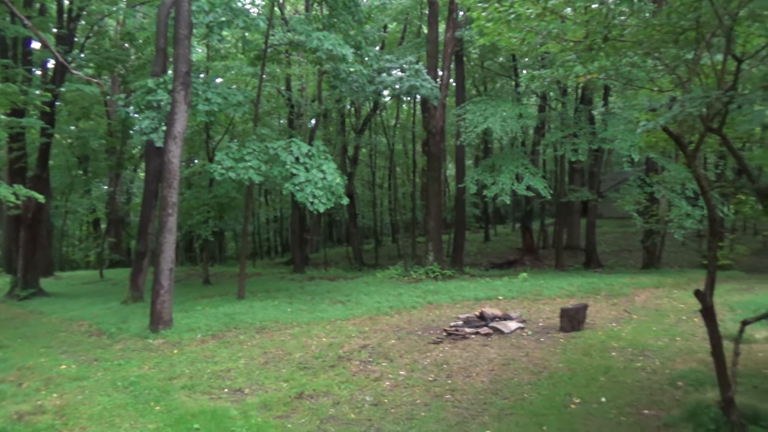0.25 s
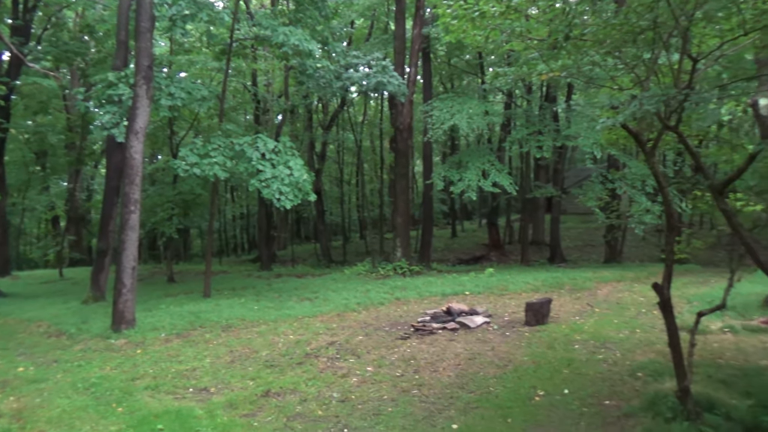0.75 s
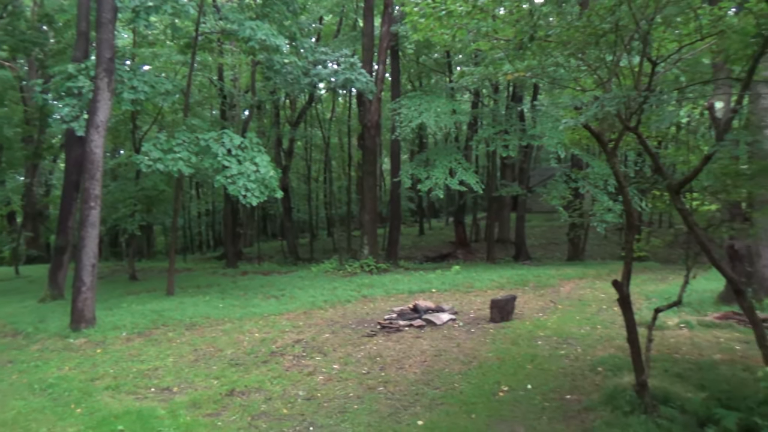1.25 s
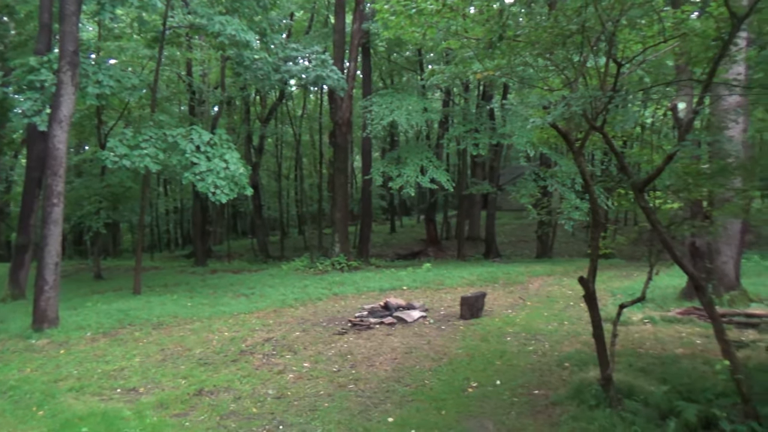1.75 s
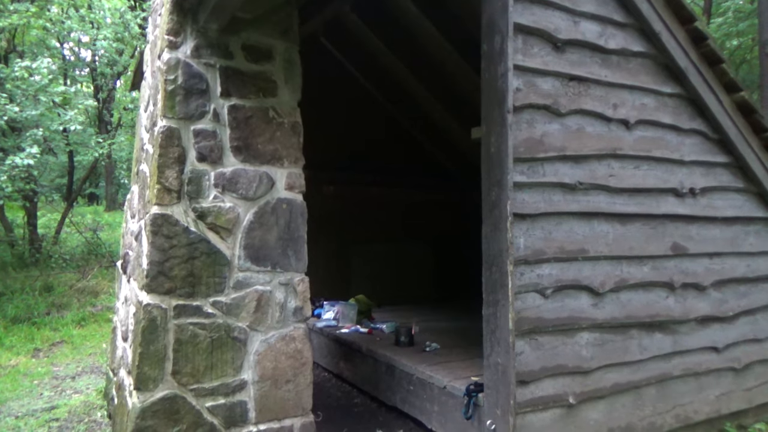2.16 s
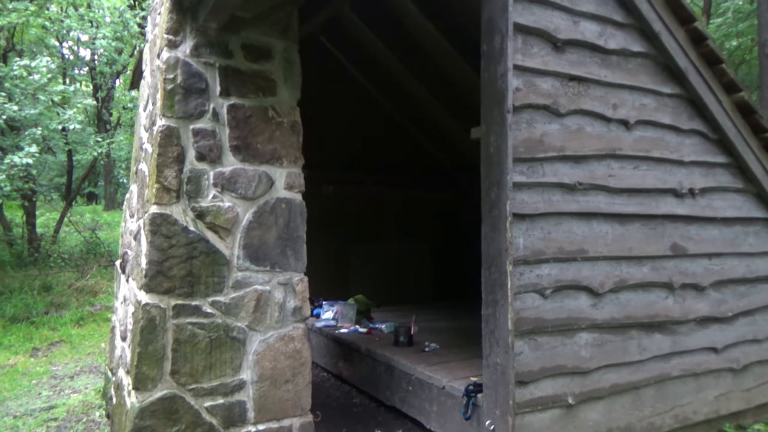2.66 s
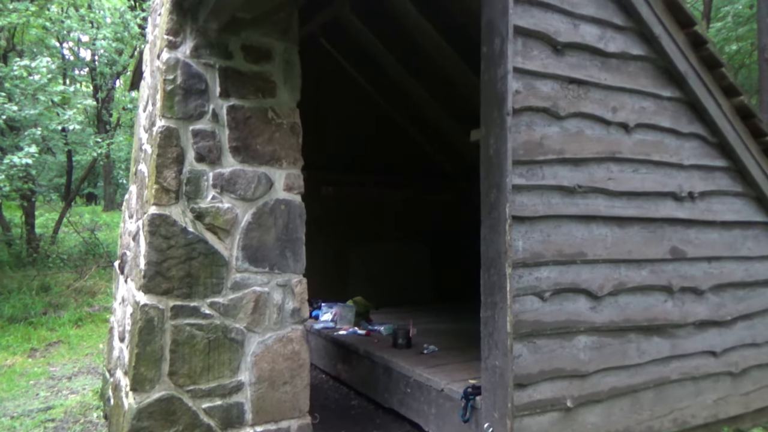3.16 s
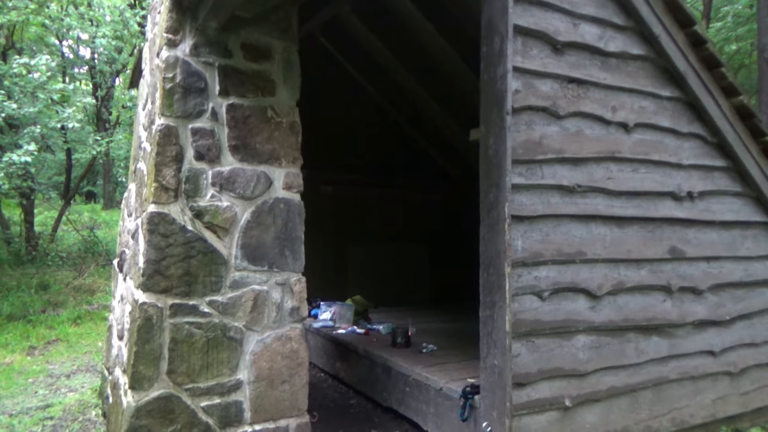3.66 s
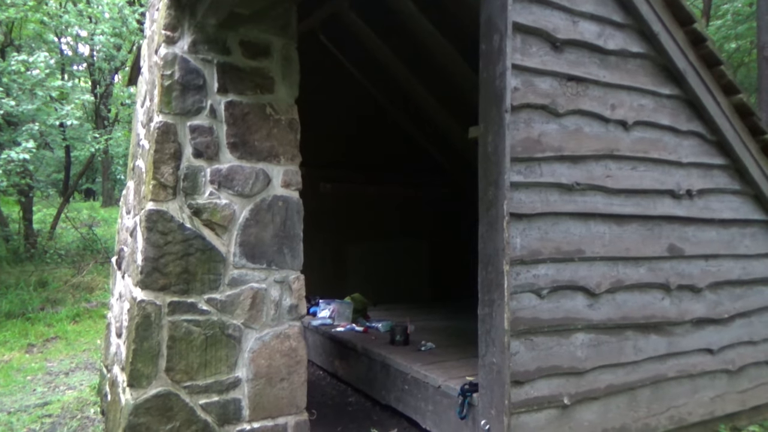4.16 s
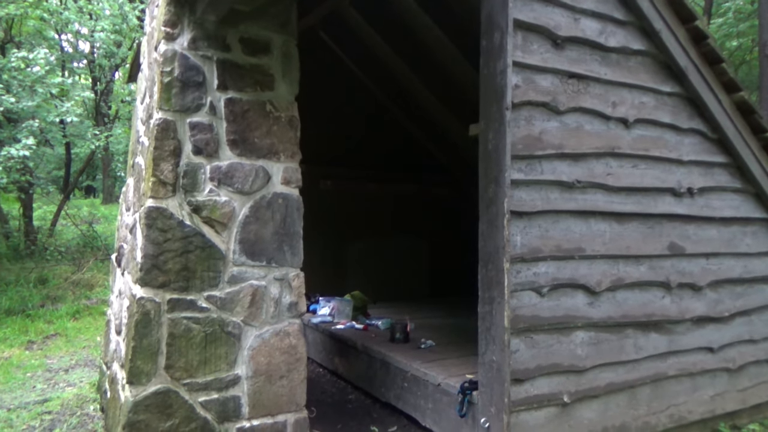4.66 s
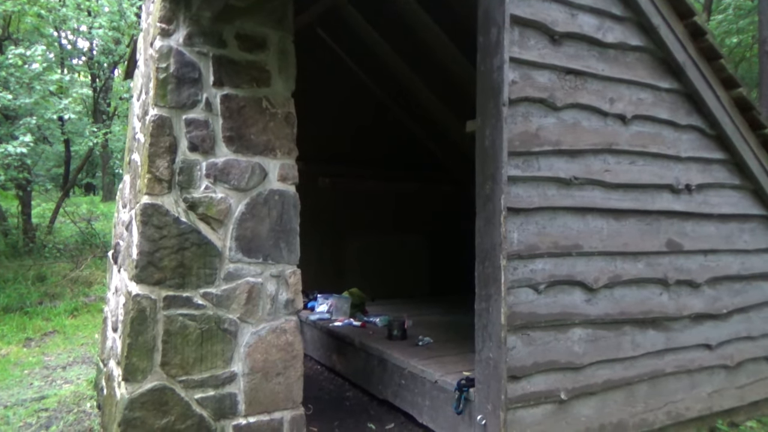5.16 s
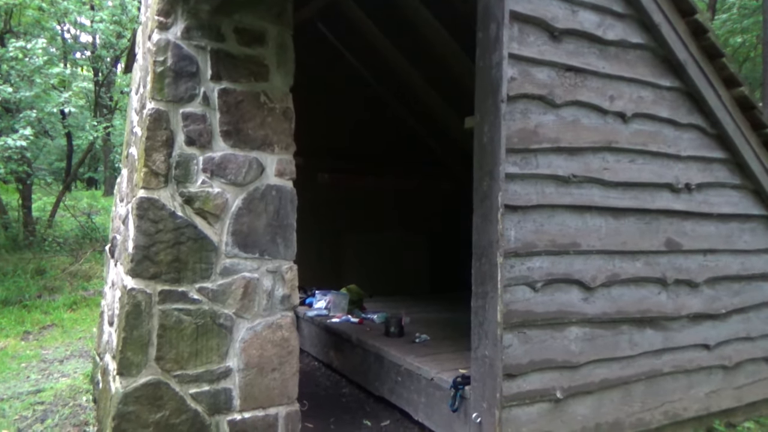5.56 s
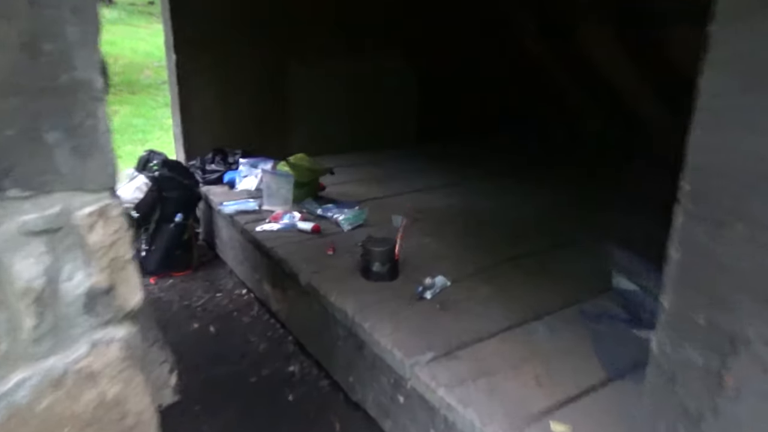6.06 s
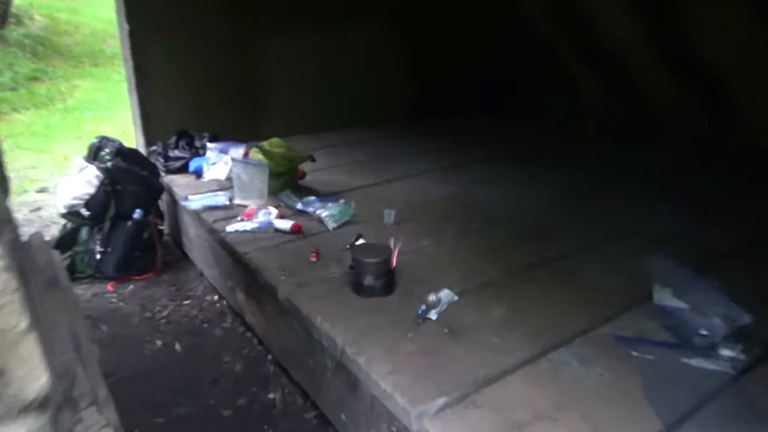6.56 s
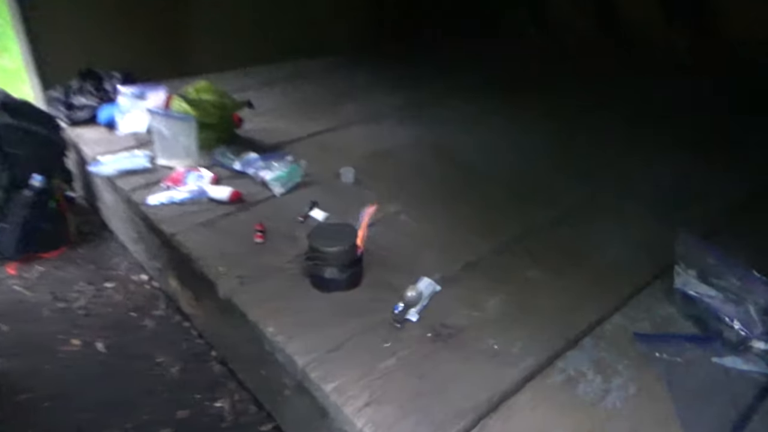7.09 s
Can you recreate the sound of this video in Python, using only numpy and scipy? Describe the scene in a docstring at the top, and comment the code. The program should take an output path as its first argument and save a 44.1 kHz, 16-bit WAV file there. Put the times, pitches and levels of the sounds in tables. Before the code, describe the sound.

In quiet woods, distant songbirds whistle short echoing phrases over a soft hush and a faint, far-off engine drone. Small things tick on the leaves. Midway, a nearer bird sings a long, dry, high trill. Near the end, two footsteps close to the microphone crunch on grit and dry leaves, snapping twigs, while the faint hollow murmur of a wooden shelter comes up.

```python
"""A quiet morning wood beside a camp shelter. From the start an engine drones far off under the hush,
distant songbirds whistle short phrases and small things tick on the leaves; the trees scatter each note.
Three seconds in, a nearer bird sings a long dry trill. Near six seconds two steps crunch on grit and
dry leaves, snapping twigs, as the shelter screens the engine and its own hollow murmur comes up."""
import sys
import numpy as np
from scipy import signal
from scipy.fft import rfft, irfft
from scipy.io import wavfile
from scipy.ndimage import uniform_filter1d

SR = 44100
rng = np.random.default_rng(int(sys.argv[2]) if len(sys.argv) > 2 else 0)


def put_to_file(sound):
    """Save the sound as 16-bit audio at rate SR, in the file named by the first command-line argument."""
    columns = np.atleast_2d(sound).T  # one column per channel
    safe = np.clip(columns, -1, 1)
    whole_steps = np.round(safe * 32767)
    wavfile.write(sys.argv[1], SR, whole_steps.astype(np.int16))


N = 323208
TIME = np.arange(N) / SR

# Tone of the crunch: (frequency [Hz], level [dB])
GRIT_SPECTRUM = [(100, -33), (260, -19.5), (380, -16), (600, -12.5), (950, -4.5), (1400, -3), (2100, -3),
                 (2750, -5.5), (3400, -7), (4500, -11.5), (6300, -11.5), (7700, -7.5), (10000, -6.5),
                 (11500, -14), (16000, -32)]
# Footfalls: (touchdown [s], heel level [dB], heel treble [dB], sole level [dB],
# time to toe-off [s], toe treble [dB], ground thud [dB])
FOOTSTEPS = [(5.95, -19, -4.5, -41, .168, 0, -28), (6.551, -32.5, 4, -42, .262, 3, -36)]

def footsteps(grains_per_s=7000, spread_db=3.0, clump_db=1.8, clumps_per_s=140, crossover_hz=4200):
    """Under each scuff a shower of grit grains slips and cracks, in clumps."""
    # a soft stir and a high rustle linger after the first step
    first_s = FOOTSTEPS[0][0]
    body_power = swell(first_s, db=-49, rise_s=.0079, decay_s=.98) ** 2
    fizz_power = swell(first_s, db=-50, rise_s=.0079, decay_s=3.5) ** 2
    slip = unit(amp(clump_db * wander(N, clumps_per_s)))
    for *step, _ in FOOTSTEPS:
        for force, treble_db in scuffs(*step):
            body_power += (slip * force) ** 2
            fizz_power += (slip * force * amp(treble_db)) ** 2
    # a harder push moves more grains, so the crunch is dense and its tail crackles
    grain_chance = grains_per_s / SR * np.clip(np.sqrt(body_power) / amp(-36), .2, 4)
    crunch = np.zeros(N)
    for kind, power in (("low", body_power), ("high", fizz_power)):
        size_db = spread_db * np.minimum(rng.exponential(1, N), 3.5)
        sizes = unit(amp(size_db) * rng.choice([-1, 1], N))
        grains = sizes * (rng.random(N) < grain_chance) / np.sqrt(grain_chance)
        crossover = signal.butter(4, crossover_hz, kind, fs=SR, output="sos")
        crunch += signal.sosfilt(crossover, colour(grains, GRIT_SPECTRUM)) * np.sqrt(power)
    return crunch


def scuffs(s, heel_db, heel_treble_db, sole_db, roll_s, toe_treble_db, settle_s=.046):
    """The shoe touches, the heel lands, grit settles, the sole rolls, the toe pushes off."""
    touch = swell(s, heel_db - 10.5, rise_s=.003, decay_s=.0081)
    heel = swell(s + .018, heel_db, rise_s=.0079, decay_s=.0145)
    settle = swell(s + settle_s, heel_db - 14, rise_s=.0082, decay_s=.046)
    sole = swell(s + settle_s, sole_db, rise_s=.018, decay_s=.054, hold_s=roll_s - settle_s)
    toe = swell(s + roll_s, db=-37, rise_s=.0052, decay_s=.014)
    # (force envelope, treble [dB])
    return [(touch, 3.5), (heel, heel_treble_db), (settle, 0), (sole, -1.5), (toe, toe_treble_db)]


# Tone of a brittle crack: (frequency [Hz], level [dB])
CRACK_SPECTRUM = [(100, -10), (500, -5), (3000, -7), (6000, -8), (10000, 0.5), (11800, -10.5), (16000, -33)]
# Twig and pebble hits: (time [s], ring peak [dB], ring pitch [Hz], crack peak [dB])
TWIG_SNAPS = [(.311, -58, 2000, -40), (0.788, -37.5, 1990, -31), (1.691, -42, 2770, -32),
              (1.719, -40, 880, -26.5), (2.113, -53, 1950, -38.5), (3.885, -37.5, 1320, -53),
              (3.891, -35.5, 1240, -53), (4.056, -47, 850, -37), (4.3, -46, 1930, -38),
              (5.93, -22.5, 2000, -30.5), (5.953, -21, 1340, -13), (5.984, -14, 2060, -27),
              (6.105, -28, 1660, -24), (6.174, -31, 1570, -27), (6.24, -20.5, 1620, -38),
              (6.345, -43, 3540, -35), (6.686, -24, 2270, -45), (6.704, -29, 1820, -31),
              (6.727, -25.5, 1920, -28), (6.747, -22, 1850, -30), (6.782, -29, 1810, -44),
              (6.813, -41, 2500, -32), (6.98, -44, 1034, -30.5)]

def twig_snaps(ring_s=0.00049, crack_s=0.00052, crumble_s=0.012, crumble_db=-17):
    """Twigs snap and pebbles knock: a brief ring, a bright crack and a crumbling tail."""
    out, t = np.zeros(N), np.arange(2000) / SR
    crumble = amp(crumble_db) * np.exp(-t / crumble_s)
    for s, ring_db, ring_hz, crack_db in TWIG_SNAPS:
        ring = np.sin(2 * np.pi * ring_hz * t) * t / ring_s * np.exp(1 - t / ring_s)
        ring += crumble * unit(band(rng.standard_normal(len(t)), ring_hz / 2, ring_hz * 2.06))
        burst = rng.standard_normal(len(t)) * (np.exp(-t / crack_s) + crumble)
        crack = colour(burst, CRACK_SPECTRUM)
        add(out, s, amp(ring_db) * ring + amp(crack_db) * crack / abs(crack).max())
    return out


# Stray soft knocks: (time [s], level [dB], centre [Hz], decay [s])
SOFT_KNOCKS = [(0.596, -48, 526, 0.0041), (3.503, -49.5, 2100, 0.011), (3.891, -42, 474, 0.0077),
               (3.901, -45, 1100, 0.0056), (5.209, -49.5, 1700, 0.0091), (6.234, -35, 1530, 0.0082),
               (6.675, -35, 2150, 0.0074), (7.29, -42.5, 810, 0.017)]
# The ground under each heel: (delay [s], level against the step's thud [dB], centre [Hz], decay [s])
GROUND_LAYERS = [(-.003, -1.5, 700, .012), (.012, 0, 680, 0.0081), (.014, -7, 265, .01)]

def thuds(band_ratio=1.47, rise_s=0.000067):
    """Dull blows that hardly ring: stray knocks, and the ground under each step."""
    out, t = np.zeros(N), np.arange(8000) / SR
    blows = list(SOFT_KNOCKS)
    for s, *_, thud_db in FOOTSTEPS:
        blows += [(s + delay, thud_db + db, hz, decay) for delay, db, hz, decay in GROUND_LAYERS]
    blows += [(s + .03, -55, 49.6, .079) for s, *_ in FOOTSTEPS]  # deep bump as the weight comes down
    for s, db, hz, decay_s in blows:
        blow = unit(band(rng.standard_normal(len(t)), hz / band_ratio, hz * band_ratio))
        add(out, s, amp(db) * blow * np.exp(-t / decay_s) * (1 - np.exp(-t / rise_s)))
    return out


def bird_trill(start_s=3.16, length_s=1.81, syllables_per_s=12.4):
    """A nearer bird repeats a thin high note and a steep falling chip, swells and breaks off."""
    tops, chips = np.zeros((2, N))
    for age in np.arange(0, length_s, 1 / syllables_per_s):
        s, left_s = start_s + age, length_s - age
        effort = amp(-8.5 * np.exp(-age / .1)) * min(left_s / .1, 1)  # soft start, quick release
        top_db, chip_db = -47.5 - 4 * left_s, -46 - 3 * left_s  # slow crescendo
        hz = 7557 + 330 * np.exp(-age / .208)  # the top note sinks as the trill gets going
        top = whistle(length_s=.07, start_hz=1.075 * hz, middle_hz=1.008 * hz, end_hz=1.004 * hz,
                      buzz=.06)
        add(tops, s, effort * amp(top_db) * top)
        chip = whistle(length_s=.075, start_hz=6490, middle_hz=5570, end_hz=4293, buzz=.428)
        chip = unit(chip * np.hanning(len(chip)) ** .5)
        add(chips, s + .022, effort * amp(chip_db) * chip)
    return woods(tops, direct_db=-9) + woods(chips, direct_db=-11)


# Clear notes sliding onto a held pitch: (time [s], length [s], start [Hz], held [Hz], level [dB])
CLEAR_WHISTLES = [(0.189, 0.13, 2150, 1943, -67), (.853, .12, 3750, 4410, -60.5),
                  (.965, 0.127, 4400, 4440, -64.5), (1.235, 0.075, 2330, 2206, -58),
                  (1.551, 0.065, 3720, 3510, -58.5), (3.32, .1, 2270, 1946, -64.5),
                  (3.487, .09, 2800, 3210, -57.5), (4.87, 0.058, 1960, 1850, -61),
                  (4.919, 0.077, 2257, 2207, -56)]
# Burry notes sweeping evenly up or down: (time [s], length [s], start [Hz], end [Hz], level [dB])
BURRY_SLURS = [(0, 0.12, 3490, 2327, -66.5), (.79, .1, 3160, 3690, -60), (1.597, 0.05, 3500, 2440, -57),
               (1.742, 0.068, 2700, 3010, -69), (1.864, 0.08, 6900, 5500, -58),
               (1.971, 0.29, 7850, 6120, -58.5), (2.156, 0.19, 4980, 5840, -60),
               (2.894, 0.071, 3014, 2550, -58), (3.521, 0.0725, 3170, 2710, -59),
               (4.431, .11, 2750, 3500, -54), (4.528, .12, 3700, 4420, -55.5),
               (4.56, 0.056, 3200, 2107, -54.5), (4.883, .22, 2560, 3555, -58.5),
               (5.549, 0.27, 4990, 4780, -65), (5.754, .1, 3590, 2590, -58),
               (6.436, 0.086, 3890, 2980, -55.5)]

def far_birds():
    """Phrases from deep among the trees; clear notes carry more directly than burry ones."""
    clear, burry = np.zeros((2, N))
    for s, length_s, start_hz, held_hz, db in CLEAR_WHISTLES:
        middle_hz = start_hz + .9 * (held_hz - start_hz)
        add(clear, s, amp(db) * whistle(length_s, start_hz, middle_hz, held_hz, buzz=.0093))
    for s, length_s, start_hz, end_hz, db in BURRY_SLURS:
        middle_hz = np.sqrt(start_hz * end_hz)
        add(burry, s, amp(db) * whistle(length_s, start_hz, middle_hz, end_hz, buzz=.524))
    return woods(clear, direct_db=-3.5) + woods(burry, direct_db=-11)


def whistle(length_s, start_hz, middle_hz, end_hz, buzz, flutter_hz=95):
    """One gliding bird note; a fast flutter of pitch gives it buzz (0-1)."""
    progress = np.linspace(0, 1, max(int(length_s * SR), 16))
    glide_hz = np.polyval(np.polyfit([0, .5, 1], [start_hz, middle_hz, end_hz], 2), progress)
    flutter = np.sin(2 * np.pi * (flutter_hz * length_s * progress + rng.random()))
    flutter += .727 * wander(len(progress), 324)
    hz = glide_hz * (1 + (.0021 + .1084 * buzz) * flutter)
    return unit(sine(hz) * signal.windows.tukey(len(hz), .5))


def leaf_ticks(per_s=9, level_db=-52, spread_db=3, decay_s=0.0017):
    """Now and then something tiny drops on the leaves."""
    sizes = amp(level_db + spread_db * np.minimum(rng.exponential(1, N), 3))
    drops = sizes * (rng.random(N) < per_s / SR)
    t = np.arange(400) / SR
    tick = colour(rng.standard_normal(len(t)) * np.exp(-t / decay_s), CRACK_SPECTRUM)
    return signal.oaconvolve(drops, tick / abs(tick).max())[:N]


# The engine's low tone builds until the shelter screens it: (time [s], level [dB])
ENGINE_FADER = [(0.3, -75), (5.85, -56), (5.93, -66.5), (7.25, -59.5)]

def far_engine(low_hz=110, high_hz=209, high_db=-72, rumble_db=-67):
    """An engine a long way off: two wavering tones over a rumble."""
    low = sine(low_hz + 4 * wander(N, 14.6)) * (1 + .18 * wander(N, 24))
    high = sine(high_hz + 3 * wander(N, 8.68)) * (1 + .71 * wander(N, 1.77))
    rumble = unit(band(rng.standard_normal(N), 74, 101, order=3))
    low_db = np.interp(TIME, *np.transpose(ENGINE_FADER))
    return amp(low_db) * unit(low) + amp(high_db) * unit(high) + amp(rumble_db) * rumble


# Tone of the open air: (frequency [Hz], level [dB])
AIR_SPECTRUM = [(20, -18), (45, -4.5), (80, -4.5), (130, -5), (190, -5.5), (270, -11), (400, -13),
                (750, -10), (1300, -14), (2000, -16), (4300, -17.5), (6500, -23), (9500, -21.5),
                (12000, -30), (16000, -35)]
# Level ride on the hush, ahead of its trim: (time [s], level [dB])
HUSH_FADER = [(0.0, -66), (3.4, -65.5), (4.07, -62.5), (4.86, -62.5), (5.85, -64)]

def wood_hush(trim_db=9):
    """A bed of woodland air that lifts a little midway."""
    level_db = trim_db + np.interp(TIME, *np.transpose(HUSH_FADER))
    return amp(level_db) * diffuse_noise(AIR_SPECTRUM, patchy_db=1.66)


# Hollow tone of the shelter: (frequency [Hz], level [dB])
SHELTER_SPECTRUM = [(20, -22), (70, -20), (140, -3), (240, 0.5), (420, -5), (720, 3), (1200, -4.5),
                    (3000, -24), (16000, -10)]

def shelter_murmur(start_s=5.8, fade_s=1.27, outside_db=-70, opening_db=-54.5):
    """The shelter's hollow murmur fades up as its opening comes near."""
    level_db = np.interp(TIME, [start_s, start_s + fade_s], [outside_db, opening_db])
    return amp(level_db) * diffuse_noise(SHELTER_SPECTRUM, patchy_db=4.5)


def diffuse_noise(spectrum, patchy_db):
    """Stereo noise with gently drifting patches in its spectrum."""
    hz, frames = np.fft.rfftfreq(4096, 1 / SR), N // 1024 + 5
    a, b, c, d, patches = rng.standard_normal((5, frames, len(hz)))
    patches = uniform_filter1d(patches, size=5, axis=0)  # smooth in time
    patches = unit(uniform_filter1d(patches, size=40, axis=1))  # and in frequency
    bins = stereo_pair([a + 1j * b, c + 1j * d], hz) * amp(at_hz(spectrum, hz) + patchy_db * patches)
    return unit(signal.istft(bins.swapaxes(1, 2), nperseg=4096, noverlap=3072)[1][:, :N])


# Reverb among the trees: (frequency [Hz], time to fall 60 dB [s])
WOOD_DECAY = [(200, 4.5), (2000, 1.27), (4500, 1.36), (8000, 0.8), (16000, 0.15)]

def woods(x, direct_db, echoes_per_s=3000):
    """Trunks scatter the sound into a long tail; leaves swallow its treble first."""
    echoes = rng.standard_normal((2, SR)) * (rng.random((1, SR)) < echoes_per_s / SR)
    hz, t, bins = signal.stft(echoes, SR, nperseg=256)
    bins = stereo_pair(bins.swapaxes(1, 2), hz) * amp(-60 * t[:, None] / at_hz(WOOD_DECAY, hz))
    tail = signal.istft(bins.swapaxes(1, 2), nperseg=256)[1]
    tail /= np.linalg.norm(tail[0])
    wet = signal.fftconvolve(x[None], tail, axes=1)[:, :N]
    return (wet + amp(direct_db) * x) / np.hypot(1, amp(direct_db))


# Stereo image of diffuse sound: (frequency [Hz], left-right likeness [0-1])
STEREO_LIKENESS = [(30, 0.985), (60, 0.995), (130, 1), (290, 0.72), (640, 0.41), (1410, 0.25), (3100, 0.38),
                   (6820, 0.69), (15000, 1)]

def stereo_pair(bins, hz):
    """Blends two independent spectra into left and right, widest in the mids."""
    shared = np.sqrt(np.clip(at_hz(STEREO_LIKENESS, hz), 0, 1)) ** 1.33
    return np.array([bins[0], shared * bins[0] + np.sqrt(1 - shared ** 2) * bins[1]])


def amp(db):
    return 10 ** (np.asarray(db) / 20)


def unit(x):
    return x / np.sqrt(np.mean(x ** 2) + 1e-20)


def sine(hz):
    return np.sin(2 * np.pi * np.cumsum(hz) / SR)


def swell(s, db, rise_s, decay_s, hold_s=0):
    """Envelope that peaks at time s, holds, then decays."""
    return amp(db) * np.exp(np.minimum(TIME - s, 0) / rise_s - np.maximum(TIME - s - hold_s, 0) / decay_s)


def wander(count, rate_hz):
    """Smooth random drift of unit RMS."""
    hz = np.fft.rfftfreq(count + SR, 1 / SR)
    return unit(irfft(rfft(rng.standard_normal(count + SR)) * np.exp(-(hz / rate_hz) ** 2)))[:count]


def add(mix, s, sound):
    part = mix[max(round(s * SR), 0):][:len(sound)]
    part += sound[:len(part)]


def at_hz(points, hz):
    """Reads a table on a log-frequency axis."""
    table_hz, value = np.transpose(points)
    return np.interp(np.log(hz + 1), np.log(table_hz + 1), value)


def colour(x, spectrum):
    """Minimum-phase EQ in the shape of the given spectrum."""
    gain_db = np.maximum(at_hz(spectrum, abs(np.fft.fftfreq(4096, 1 / SR))), -100)
    response = np.exp(np.conj(signal.hilbert(np.log(amp(gain_db)))))
    taps = np.fft.ifft(response).real[:2048]
    return signal.fftconvolve(x, taps / np.linalg.norm(taps))[:len(x)]


def band(x, low_hz, high_hz, order=2):
    edges_hz = [low_hz, min(high_hz, .49 * SR)]
    return signal.sosfilt(signal.butter(order, edges_hz, "band", fs=SR, output="sos"), x)


def scene():
    """Close foley, almost dry, in front of the birds, the engine and the hush."""
    near = footsteps() + twig_snaps() + thuds() + leaf_ticks()
    # the first step falls to the left, most of all in the upper mids
    lean = np.interp(TIME, [5.9, 5.97, 6.4], [0, 1, 0])
    side = lean * (.022 * near + .3 * band(near, 2300, 3200, order=1))
    # glancing treble arrives a touch late and widens the image
    side += .17 * np.roll(band(near, 4000, 10000, order=1), shift=9)
    bed = wood_hush() + shelter_murmur() + far_engine()
    birds = far_birds() + bird_trill()
    return bed + birds + woods(near, direct_db=19.5) + np.array([side, -side])


def record(dry):
    """A steep high cut at 15.9 kHz on the whole mix."""
    high_cut = signal.firwin(511, 15900, window=("kaiser", 9), fs=SR)
    return signal.oaconvolve(dry, high_cut[None], "same")


dry = scene()
out = record(dry)
put_to_file(out)
```